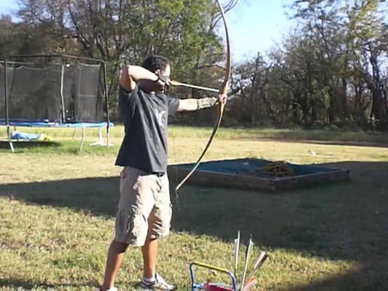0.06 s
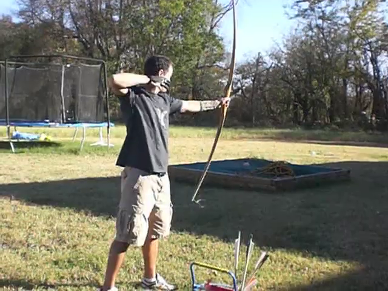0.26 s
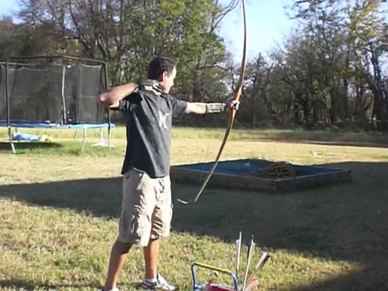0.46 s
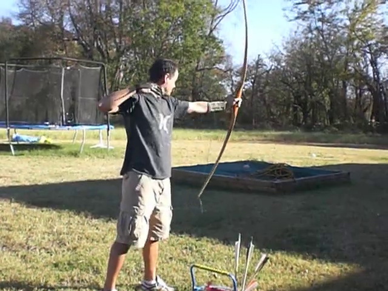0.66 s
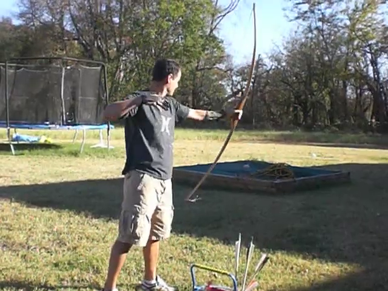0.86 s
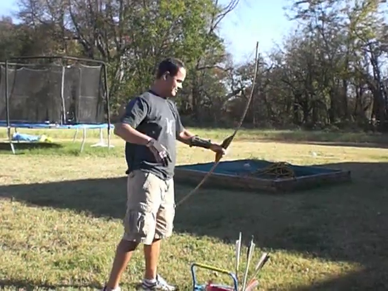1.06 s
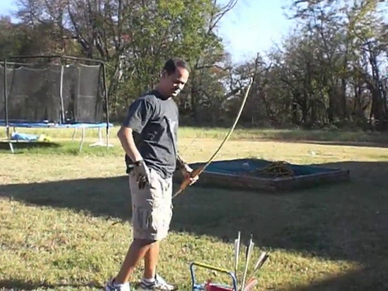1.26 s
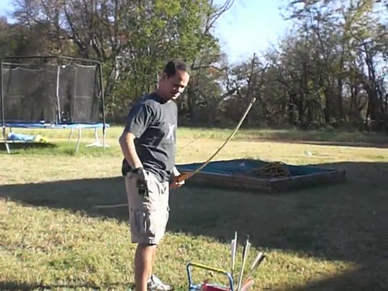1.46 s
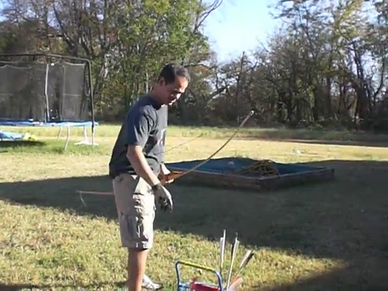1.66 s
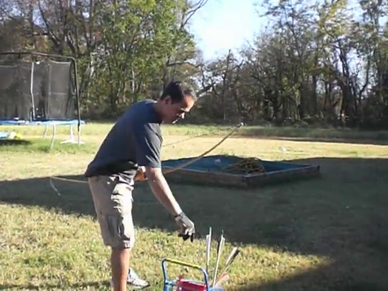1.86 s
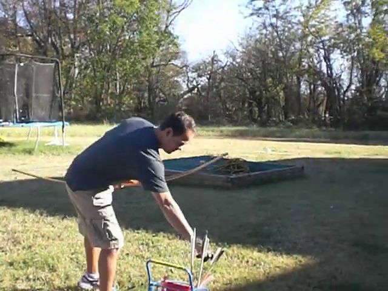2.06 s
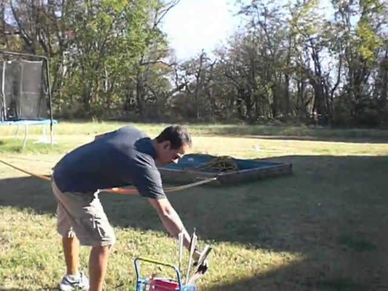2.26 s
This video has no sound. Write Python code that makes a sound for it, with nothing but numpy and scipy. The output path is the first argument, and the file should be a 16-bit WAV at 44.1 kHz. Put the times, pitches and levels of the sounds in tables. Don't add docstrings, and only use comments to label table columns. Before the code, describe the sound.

A longbow releases at about 0.25 s: a brief scrape, then a hard, rapidly chattering snap with ringing wood and bright echoes off fences until about 0.5 s. At 0.61 s the arrow punches a hollow target, a dry thud with low returns. Around 1.3-2.2 s grass and cloth rustle, with gear clicks clustered near 1.62 s and a small falling chirp at 1.72 s. Soft traffic hum and a faint cricket continue beneath.

```python
import sys
import numpy as np
from scipy import signal
from scipy.io import wavfile
from scipy.ndimage import uniform_filter1d

SR = 44100
rng = np.random.default_rng(int(sys.argv[2]) if len(sys.argv) > 2 else 0)


def put_to_file(sound):
    columns = np.atleast_2d(sound).T
    safe = np.clip(columns, -1, 1)
    whole_steps = np.round(safe * 32767)
    wavfile.write(sys.argv[1], SR, whole_steps.astype(np.int16))


def level_to_linear(level):
    exponent = np.asarray(level, float) / 20
    return 10 ** exponent


N = 101429
T = np.arange(N) / SR
THUD_S = .6147


def band(x, hz, width_hz, order=2):
    edges = np.clip([hz - width_hz / 2, hz + width_hz / 2], 10, SR * 9 / 20)
    return signal.sosfilt(signal.butter(order, edges, "band", fs=SR, output="sos"), x)


def unit(x):
    return x / np.sqrt(np.mean(x ** 2))


def hiss():
    return rng.standard_normal(N)


def walk(rate):
    k = int(SR / rate)
    steps = np.repeat(rng.standard_normal(N // k + 1), k)
    return unit(uniform_filter1d(uniform_filter1d(steps, k), k)[:N])


def grit(rate, spread_db):
    return unit(hiss() * level_to_linear(spread_db * walk(rate)))


def curve(rows):
    s, db = np.array(rows).T
    return level_to_linear(np.interp(T, s, db, left=-140, right=-140))


def ring(s, hz, db, t60, rise=1e-4):
    u = np.maximum(T - s, 0)
    decay = level_to_linear(db - 60 * np.minimum(u / t60, 5))
    return decay * (1 - np.exp(-u / rise)) * np.sin(2 * np.pi * hz * u)


def tone(hz):
    return np.sin(2 * np.pi * np.cumsum(hz) / SR)


# pitch [Hz], level per Hz [dB].
AIR_SPECTRUM = [(30, -12), (400, -7.5), (1000, -6), (1700, -21), (6000, -23.5), (7700, -25), (9500, -27),
                (14500, -25.5)]
# time [s], level [dB].
TRAFFIC_SWELL = [
    (0, -1.5),
    (.6, -1),
    (1.1, -2.5),
    (1.5, 0.5),
    (1.9, -0.5),
    (2.15, 3),
    (2.3, 2),
]


def yard():
    s, db = np.array(TRAFFIC_SWELL).T
    swell = np.interp(T, s, db)
    spectrum_hz, spectrum_db = np.array(AIR_SPECTRUM).T
    air = 0
    for hz in 25 * 2 ** np.arange(0, 9.5, 1 / 3):
        third = band(hiss(), hz, hz * 0.26, order=1)
        traffic_share = np.exp(-(np.log(hz / 800) / 0.33) ** 2)
        level = np.interp(np.log(hz), np.log(spectrum_hz), spectrum_db)
        air = air + third * level_to_linear(level + traffic_share * swell + 0.99 * walk(8.55))
    air = air - 0.23 * band(air, 7600, 841.7, order=1)
    hum_level = level_to_linear(-63.5 + 0.39 * walk(12.3)) * 2 ** .5
    hum = hum_level * tone(440 * (1 + 0.0065 * walk(8.5)))
    drone = level_to_linear(-66.5 + 2.6 * swell) * unit(band(hiss(), 733, 120))
    top_hiss = level_to_linear(-62.5) * unit(band(hiss(), 15000, 2200, order=1))
    return level_to_linear(-53) * unit(air) + hum + drone + top_hiss


# start [s], length [s], level [dB].
CRICKET_CALLS = [
    (.05, .13, -68.5),
    (.55, .06, -70),
    (.81, .07, -68),
    (1.08, .07, -68),
    (1.81, .07, -68),
    (2.23, .05, -69),
]
# time [s], pitch [Hz], level [dB].
CHIRP_GLIDE = [
    (1.712, 2800, -70),
    (1.718, 2800, -59),
    (1.734, 2760, -53),
    (1.744, 2700, -56),
    (1.75, 2460, -56),
    (1.766, 2300, -60),
    (1.776, 2120, -57),
    (1.796, 2020, -59),
    (1.80, 2000, -72),
]
# start [s], pitch [Hz], level [dB], time to fall 60 dB [s].
CHIRP_SIDE_NOTES = [
    (1.716, 1800, -50, .1),
    (1.728, 3350, -57, .08),
    (1.797, 2750, -54, .06),
]


def wildlife():
    calls = 0
    for s, length, db in CRICKET_CALLS:
        calls = calls + level_to_linear(db) * np.sin(np.pi * np.clip((T - s) / length, 0, 1)) ** .5
    cricket = unit(band(grit(140, 1.1), 8830, 400)) * calls
    s, hz, db = np.array(CHIRP_GLIDE).T
    pitch = np.interp(T, s, hz) * (1 + .045 * walk(500))
    chirp = curve(np.c_[s, db]) * level_to_linear(2 + 3 * walk(200)) * tone(pitch)
    sides = sum(ring(*side, rise=.004) for side in CHIRP_SIDE_NOTES)
    return cricket + chirp + sides


# time [s], level [dB].
RUSTLE_LEVEL = [(1.2, -66.5), (1.33, -58.5), (1.35, -55.5), (1.48, -53), (1.53, -49), (1.6, -49.5),
                (1.64, -56), (1.76, -60.5), (1.83, -58), (1.95, -57), (2.15, -61.5), (2.3, -66)]
# start [s], level [dB], pitch [Hz], time to fall 60 dB [s].
NEAR_CLICKS = [(.2343, -30, 14200, .004), (.2474, -25, 4000, .006), (.2476, -33, 9000, .006),
               (.3385, -26, 10200, .003), (.3385, -28, 2200, .004), (.3385, -34, 1000, .006),
               (1.3412, -42, 13000, .006), (1.612, -39, 14500, .008), (1.618, -19, 14300, .0025),
               (1.618, -25, 10800, .003), (1.618, -29, 7000, .003), (1.618, -36, 4000, .003),
               (1.621, -23, 9400, .004), (1.621, -30, 13600, .004), (1.621, -30, 15300, .003),
               (1.621, -31, 4200, .004), (1.621, -33, 1700, .008), (1.621, -37, 700, .006),
               (1.621, -52, 110, .04), (1.6266, -28, 9300, .006), (1.6266, -32, 11500, .005),
               (1.6266, -33, 15200, .005), (1.6266, -36, 4500, .005), (1.6542, -23, 11000, .0035),
               (1.6542, -24, 15200, .003), (1.6542, -29, 5100, .004), (1.6542, -32, 8700, .004),
               (1.6542, -43, 600, .006), (1.6928, -36, 12000, .008), (1.6928, -40, 4500, .008),
               (1.6928, -42, 2800, .008), (1.6928, -43, 6500, .006), (1.717, -42, 12000, .003),
               (1.7222, -35, 6800, .004), (1.7222, -38, 7800, .005), (1.7222, -40, 4100, .005),
               (1.7222, -39, 12000, .006), (1.8064, -37, 13000, .005), (1.8064, -43, 6800, .005),
               (1.864, -42, 13000, .005), (1.9154, -41, 14000, .005), (2.0017, -37, 13000, .009),
               (2.0017, -42, 7500, .007), (2.1524, -42, 13400, .007), (2.2542, -43, 10000, .007)]


def gear():
    stalks = unit(band(grit(1500, 3.1), 12476, 8500))
    cloth = level_to_linear(-7) * unit(band(grit(740, 1.2), 3750, 2400, order=1))
    rustle = curve(RUSTLE_LEVEL) * (stalks + cloth)
    rough = 1 + level_to_linear(-10) * unit(band(hiss(), 1500, 3400))
    clicks = rough * sum(ring(s, hz, db, t60, rise=4e-5) for s, db, hz, t60 in NEAR_CLICKS)
    footfall = ring(2.045, 50.65, -46, 0.093, rise=0.003862)
    return rustle + clicks + footfall


# time [s], level [dB].
ECHO_LEVEL = [
    (.262, -53),
    (.270, -37),
    (.284, -33.5),
    (.31, -33.5),
    (.334, -31.5),
    (.38, -44.5),
    (.446, -54),
    (.52, -60),
    (.62, -62),
]
# pitch [Hz], level [dB].
ECHO_RINGING = [(4115, -3), (4770, 1), (5420, 5), (6200, 4), (6850, 3.5)]
# arrival [s], level [dB], pitch [Hz].
FENCE_RETURNS = [(.2861, -21, 6640), (.2861, -22, 5430), (0.294, -25, 5450), (.3030, -16.5, 6700),
                 (.3066, -19, 4940), (0.3063, -25, 4160), (.3090, -27, 6300), (.3130, -23, 5960),
                 (0.3203, -29, 4870), (0.3242, -20.5, 6690), (.3441, -32.5, 6240), (0.389, -37, 5300),
                 (0.415, -51, 7040)]


def snap_echo():
    high = 0
    for hz, db in [(4300, -0.5), (4900, -9), (5900, -2.5), (6500, -5)]:
        high = high + unit(band(grit(700, 2.7), hz, 1699)) * level_to_linear(db + 0.89 * walk(150))
    top_fade = level_to_linear(-1 - 60 * np.maximum(T - .31, 0) / 0.35)
    top = unit(band(grit(700, 3.9), 7940, 1600)) * top_fade
    pitched = 0
    for hz, db in ECHO_RINGING:
        pitched = pitched + unit(band(hiss(), hz, 210, order=1)) * level_to_linear(db + 2 * walk(81))
    low = 0
    for hz, db in [(200, -10), (500, -9), (1000, 3), (1500, -12), (2200, 4.5), (3000, -37), (11500, -5)]:
        low = low + unit(band(hiss(), hz, hz * 0.63)) * level_to_linear(db)
    scattered = 0.49 * (unit(high) + top) + level_to_linear(-7) * unit(pitched) + level_to_linear(-8) * unit(low)
    bounce_s = .00158
    fences = 0
    for s, db, hz in FENCE_RETURNS:
        for k in range(4):
            fences = fences + ring(s + bounce_s * k, hz, db - 3.8 * k, 0.015, rise=0.0000815)
    return curve(ECHO_LEVEL) * scattered + fences


# pitch [Hz], level [dB], time to fall 60 dB [s].
TARGET_MODES = [(226.95, -62, 0.017), (350, -23.5, 0.051), (440, -18, 0.014), (630, -10.5, 0.014),
                (1470, 0, 0.0012), (2220, -29, 0.015), (2640, -21.5, 0.022), (4210, -1, 0.0025),
                (5540, -8, 0.00078), (7650, -22, 0.0017), (9200, -15.5, 0.0033), (11820, -14, 0.0016),
                (14860, -28, .002)]
# centre [Hz], width [Hz], level [dB], time to fall 60 dB [s].
THUD_ECHOES = [(233, 150, -38, 0.35), (334, 130, -40, 0.45), (640, 320, -36, 0.29), (2240, 560, -39, 0.33),
               (2470, 890, -48, 1.46), (3540, 660, -51, 0.62)]
# arrival [s], pitch [Hz], level [dB], time to fall 60 dB [s].
WALL_RETURNS = [
    (.6215, 650, -22, 0.016),
    (0.6322, 278, -23, 0.037),
    (.6325, 2820, -27, .008),
    (.639, 450, -33, 0.055),
    (0.65, 343, -33.5, 0.11),
    (.652, 650, -40, 0.037),
    (0.675, 226, -41.5, 0.088),
    (.681, 420, -42, 0.059),
    (.686, 312, -41, 0.057),
    (.697, 395, -37, 0.058),
]


def thud():
    u = np.maximum(T - THUD_S, 0)
    struck = sum(ring(THUD_S, hz, db, t60, rise=0.000066) for hz, db, t60 in TARGET_MODES)
    lodging = np.sin(np.pi * np.clip(u / .0013, 0, 1)) ** 2.26
    punch = level_to_linear(2.5) * lodging * np.sin(2 * np.pi * 2630 * u)
    crack = level_to_linear(-40) * np.exp(-u / 0.00043) * hiss()
    spray = level_to_linear(-20 - 60 * u / 0.0091) * unit(band(grit(1000, 0.9), 5900, 5700, order=1))
    out = struck + punch + (u > 0) * (crack + spray)
    echo_onset = np.clip(u / 0.02, 0, 1) ** 2
    for hz, width_hz, db, t60 in THUD_ECHOES:
        out = out + unit(band(grit(200, 1.6), hz, width_hz)) * level_to_linear(db - 60 * u / t60) * echo_onset
    out = signal.sosfilt(signal.butter(2, 220, "high", fs=SR, output="sos"), out)
    walls = sum(ring(*wall, rise=0.00048) for wall in WALL_RETURNS)
    thump = ring(THUD_S, 45, -41, 0.034, rise=0.0008)
    return out + walls + thump


# pitch [Hz], level [dB], time to fall 60 dB [s].
BOW_MODES = [(148.8, -52, 0.22), (315, -27.5, 0.036), (898, -34, 0.17), (1245, -42, 0.081),
             (1818, -23, 0.054), (2200, -18, 0.047), (2970, -17.5, 0.043)]
# time [s], level [dB].
SCRAPE_LEVEL = [
    (.230, -58),
    (.2345, -31),
    (.2405, -31),
    (.2468, -40),
    (.2476, -25),
    (.2505, -29),
    (.2535, -21),
    (.256, -26),
    (.268, -34),
]
# start [s], level [dB], pitch [Hz].
GRIP_SLAPS = [(.2368, -4, 4100), (.2385, -7, 4200), (.2401, -11, 3900), (.2547, 7.5, 5300),
              (.2562, 7, 5200), (.2580, 0, 4900), (.2592, 3.5, 5150), (.2608, 0, 4900), (.2626, -4, 4600),
              (.2643, -9, 4200), (.2660, -14, 4500)]


def release():
    out = curve(SCRAPE_LEVEL) * unit(band(grit(1500, 1.2), 3480, 5840))
    for late, hz in [(-.0003, 13500), (.0003, 9500)]:
        puff = np.exp(-((T - .2537 - late) / .0011) ** 2)
        out = out + level_to_linear(-13.5) * puff * band(hiss(), hz, 3700)
    for s, db, hz in GRIP_SLAPS:
        for j in (-1, 0, 1):
            out = out + ring(s, hz * (1 + .11 * j), db - 6 - 3 * abs(j), .0045, rise=.0003)
    wood = sum(ring(.2549, hz, db, t60, rise=0.0027) for hz, db, t60 in BOW_MODES)
    return out + wood


def scene():
    shot = release() + snap_echo() + thud()
    return (shot + gear() + wildlife() + yard())[None]


def band_limit(x):
    return signal.sosfilt(signal.butter(12, 17020, fs=SR, output="sos"), x)


def record(dry):
    wet = signal.sosfilt(signal.ellip(8, .2, 50, 15850, fs=SR, output="sos"), dry)
    limit = .78
    wet = wet / (1 + (wet / limit) ** 4) ** (1 / 4)
    u = T - THUD_S - .012
    duck_db = -6 * (u > 0) * np.exp(-np.abs(u) / 0.075)
    return band_limit(wet * level_to_linear(duck_db))


dry = scene()
out = record(dry)
put_to_file(out)
```